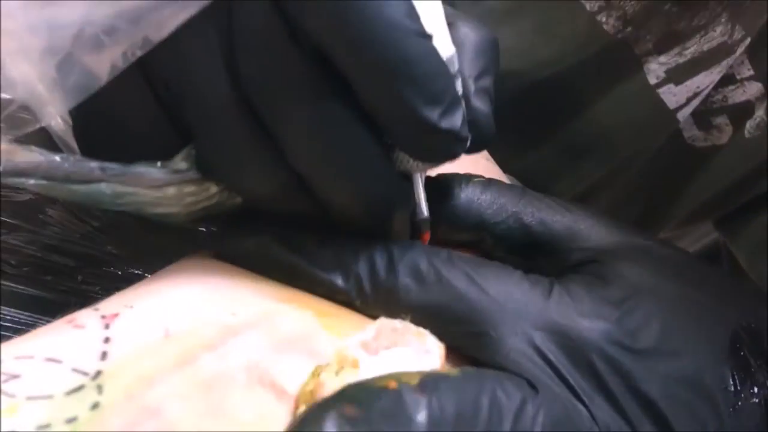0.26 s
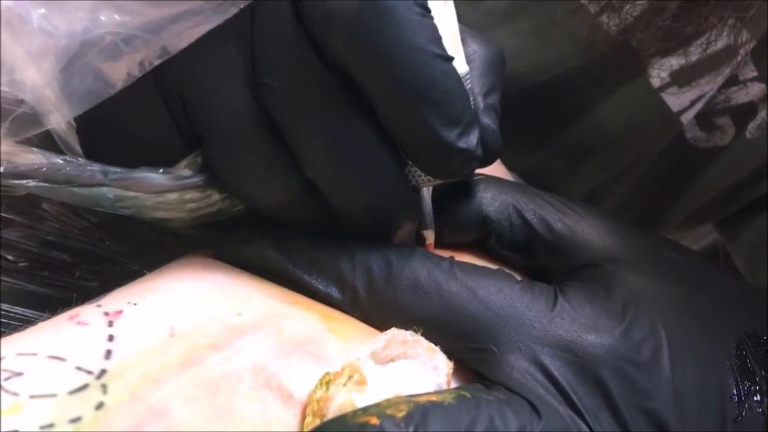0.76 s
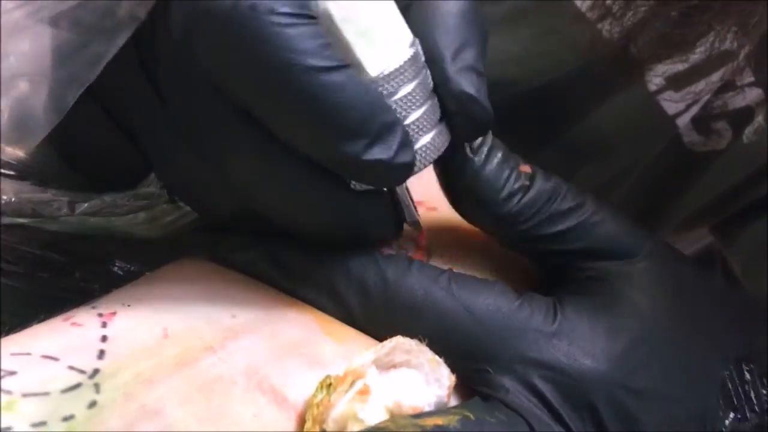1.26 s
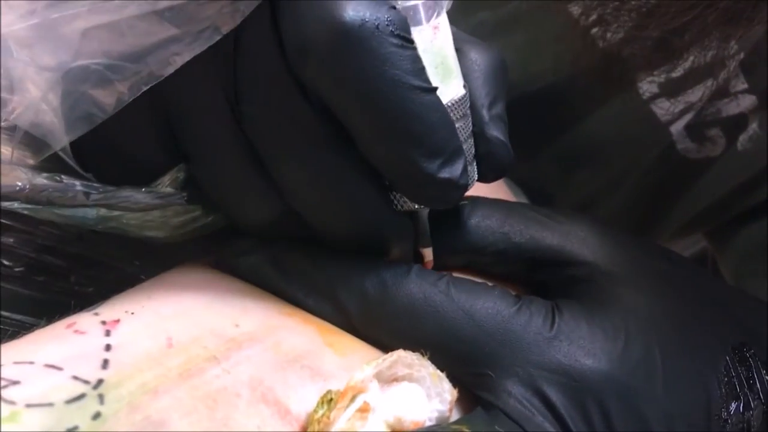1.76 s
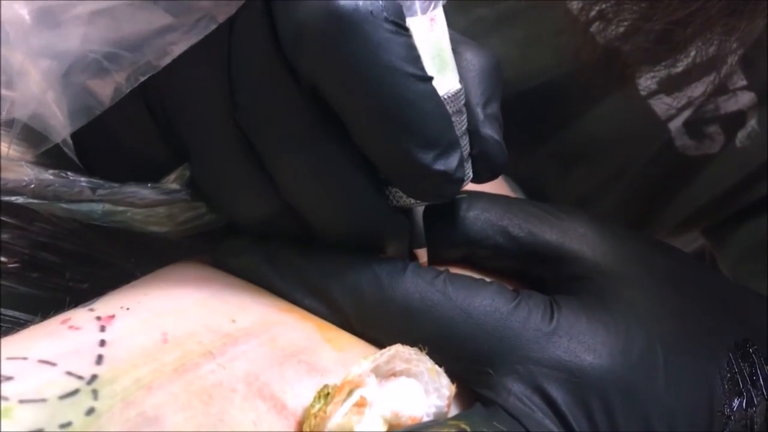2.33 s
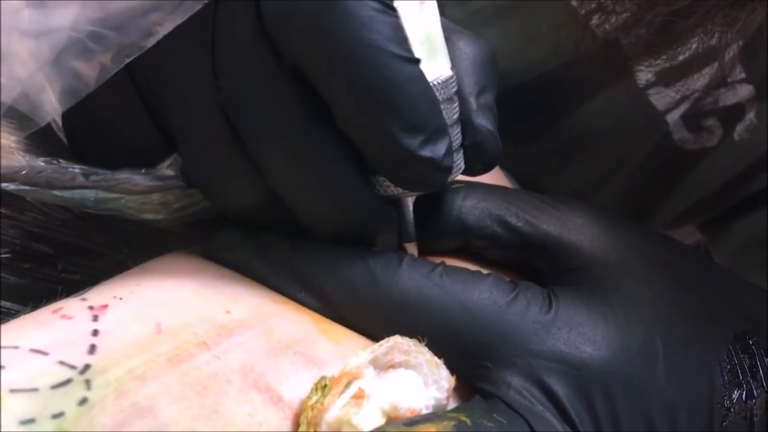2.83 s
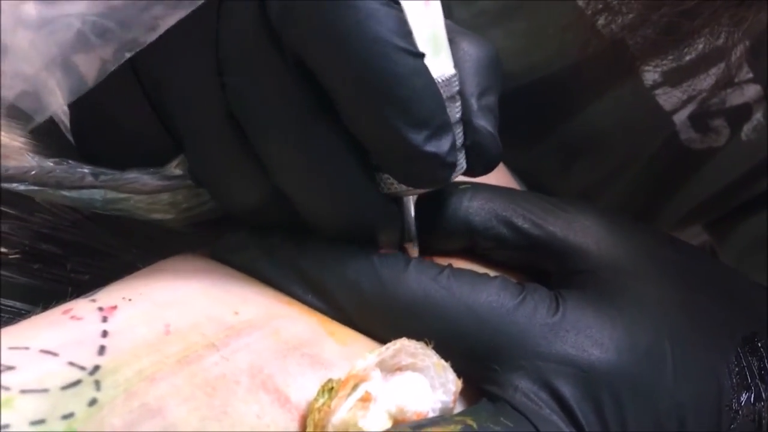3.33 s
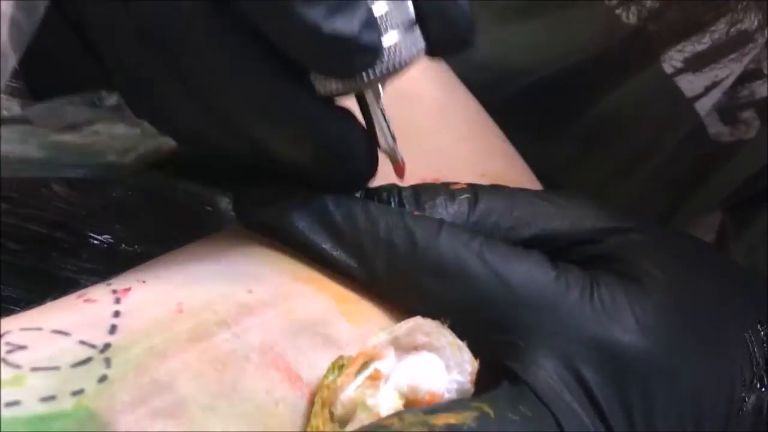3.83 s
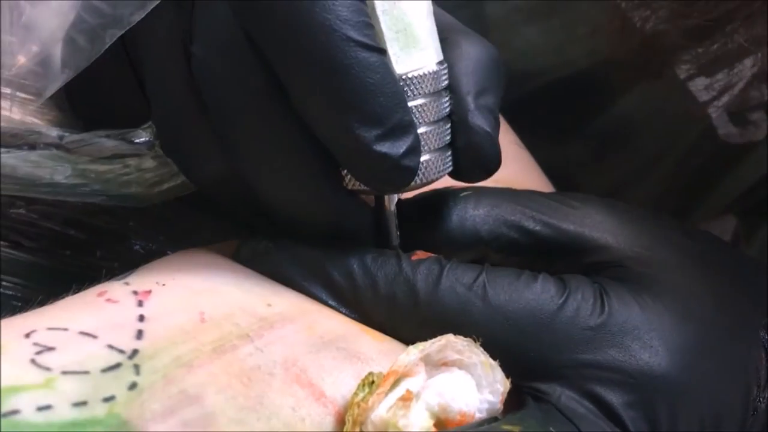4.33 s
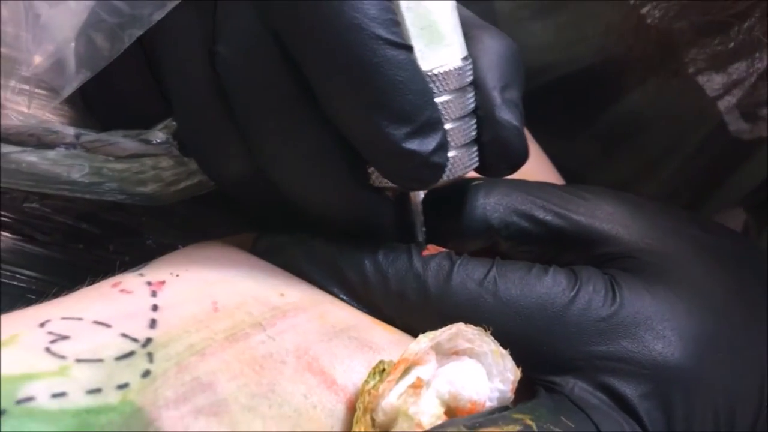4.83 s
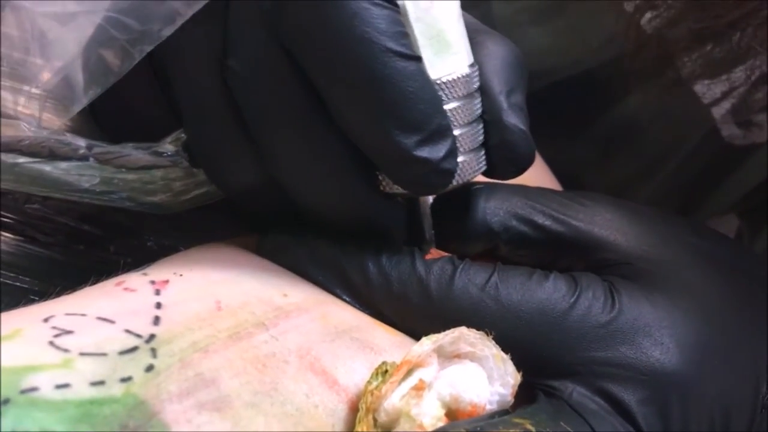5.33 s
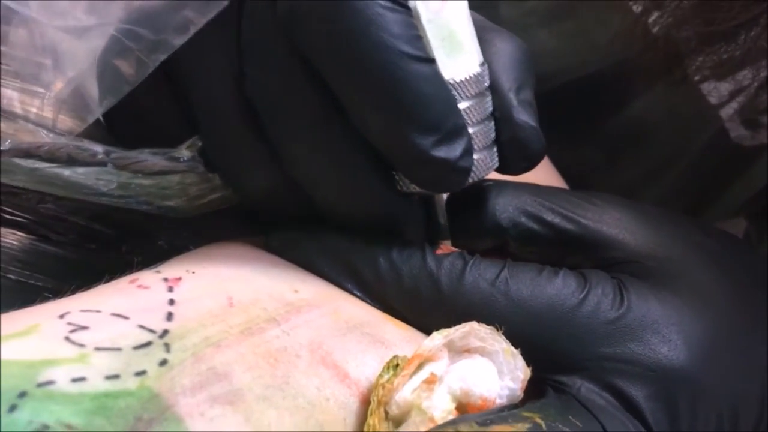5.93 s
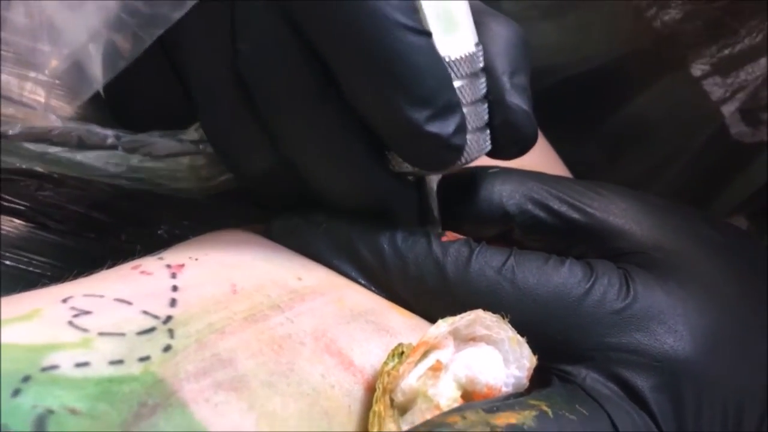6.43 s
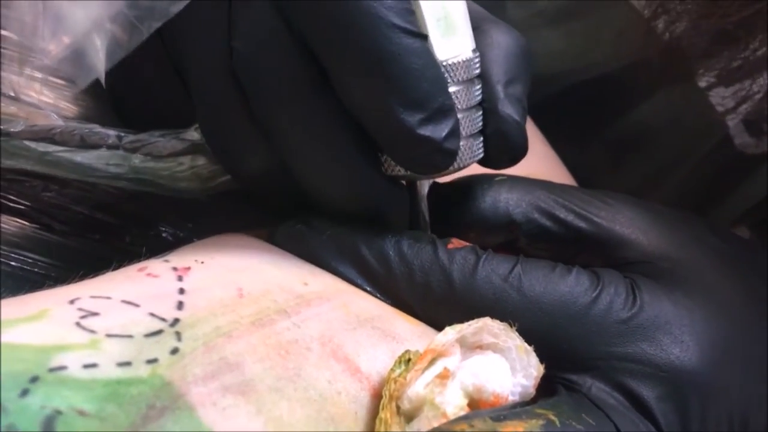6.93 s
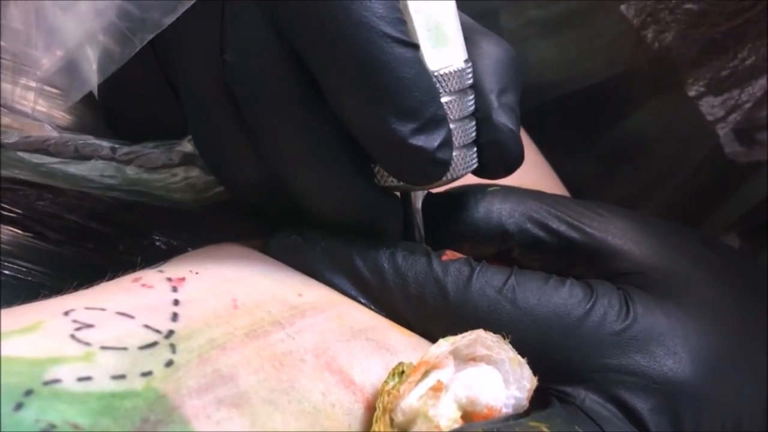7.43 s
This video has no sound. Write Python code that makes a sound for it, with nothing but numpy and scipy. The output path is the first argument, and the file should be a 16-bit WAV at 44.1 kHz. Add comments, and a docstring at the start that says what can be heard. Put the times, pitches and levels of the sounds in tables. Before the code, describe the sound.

In a quiet studio, a tattoo machine runs without stopping, heard close up as a thin, raspy metal buzz with a faint hum beneath. It wavers gently with the pressure of the needle on skin and changes colour slightly midway as the grip shifts. Tiny whistling dips flick through the buzz, and several soft low bumps sound toward the end.

```python
"""A small tattoo machine buzzes close by while its needle works on skin in a quiet studio.
Every stroke knocks the metal frame, whose tone depends on how it is held; the frame also sings on
a few overtones and the motor hums. The hand shades in small circles that load the motor.
Now and then the buzz thins for an instant to a few whistling tones. A few dull bumps come,
most near the end, over low room noise."""
import sys
import numpy as np
from scipy import signal
from scipy.fft import rfft, irfft
from scipy.io import wavfile
from scipy.ndimage import uniform_filter1d

SR = 44100
rng = np.random.default_rng(int(sys.argv[2]) if len(sys.argv) > 2 else 0)


def transcribe(u):
    """Save the signal u as a 16-bit wav file named by the first command-line argument.

    u: samples, shape (n,) or (channels, n), limited to [-1, 1]; the rate is SR.
    q: integer samples, one column per channel.
    """
    v = np.clip(np.atleast_2d(u).T, -1, 1)
    q = np.round(v * 32767).astype(np.int16)
    wavfile.write(sys.argv[1], SR, q)


N = 338727
TIME = np.arange(N) / SR

# moments when the buzz thins to a whistle: middle_s, length_s, depth_db (the dip is capped), whistle_hz
THIN_MOMENTS = [(0.021, 0.018, 9, 6150), (0.215, 0.015, 9, 13000), (0.38, 0.024, 9, 6270),
                (0.432, 0.012, 12, 8000), (0.518, 0.03, 18, 14440), (0.653, 0.019, 23, 7930),
                (0.689, 0.016, 14, 8000), (1.021, 0.014, 20, 6480), (1.481, 0.029, 12, 14700),
                (2.889, 0.025, 7, 8000), (3.347, 0.017, 13, 7660), (3.88, 0.013, 7, 7480),
                (4.059, 0.025, 9, 6530), (4.274, 0.035, 9, 4830), (4.433, 0.015, 19, 14860),
                (4.523, 0.041, 69, 15300), (4.608, 0.021, 9, 4820), (4.696, 0.023, 10, 7530),
                (4.777, 0.017, 12, 7440), (4.945, 0.025, 14, 6680), (4.976, 0.019, 16.5, 14800),
                (5.18, 0.013, 21.5, 14730), (5.841, 0.02, 14, 10760), (6.512, 0.015, 8, 11250),
                (7.11, 0.031, 35.5, 14500), (7.165, 0.017, 19, 8000), (7.25, 0.013, 16, 4850)]


def needle_drive(turns):
    """Each knock of the needle bar sets loose parts chattering; the bar rubs in its tube all the time."""
    # how hard and bright the bar knocks: time_s, force_db, extra_treble_db
    knock_strength = [(0, -2, 8.5), (.3, 0, -1.5), (1.1, -0.4, -3), (1.85, -0.5, 0), (2.7, -1.4, -3.5),
                      (3.0, 0.5, -3.5), (3.65, -1, -2), (3.95, 1, 0.5), (4.85, 0.1, -0.5), (5.6, -1.4, 0),
                      (6.25, -1.8, -.2), (6.7, -0.4, -0.7), (7.68, -0.1, -2)]
    chatter_db, rub_db, chatter_decay_turns = -17.5, -14, 0.45
    force_db, bright_db = in_time(knock_strength)
    free, first, second = grip_shares()
    treble = signal.butter(2, 9100, "high", fs=SR, output="sos")
    # the first grip is looser: its knocks land less evenly, spread further and rub more
    knocks = strokes(turns, jitter_s=4e-6 * free + 11e-6 * first + 6e-6 * second, uneven_db=.9)
    long_knocks = np.sqrt(1 - second) * bending_wave(knocks, travel_s=.0012)
    short_knocks = np.sqrt(second) * bending_wave(knocks, travel_s=.0003076)
    chatter = rms_one(rng.standard_normal(N) * np.exp(-(turns % 1) / chatter_decay_turns))
    rub = (1 + first) * signal.sosfiltfilt(treble, rng.standard_normal(N))
    drive = long_knocks + short_knocks + from_db(chatter_db) * chatter + from_db(rub_db) * rub
    drive += (from_db(bright_db) - 1) * signal.sosfiltfilt(treble, drive)
    return drive * from_db(force_db)


def strokes(turns, jitter_s, uneven_db):
    """One sharp knock per motor turn, each a little off in time and strength."""
    at = np.interp(np.arange(1, int(turns[-1])), turns, np.arange(N))
    chance = rng.standard_normal((len(at), 2))
    at = at + chance[:, 0] * jitter_s[at.astype(int)] * SR
    taps = np.round(at)[:, None].astype(int) + np.arange(-8, 9)
    offset = taps - at[:, None]
    knock = np.sinc(offset) * np.sinc(offset / 9)   # a click that can fall between samples
    out = np.zeros(N)
    np.add.at(out, np.clip(taps, 0, N - 1), knock * from_db(uneven_db * chance[:, 1:]))
    return rms_one(out)


def bending_wave(x, travel_s):
    """High pitches cross metal faster, so a knock becomes a falling chirp; travel_s holds at 10 kHz."""
    hz = np.arange(N // 2 + 1) * SR / N
    return irfft(rfft(x) * np.exp(-4j * np.pi * travel_s * np.sqrt(hz * 10000)), N)


def frame_ring(drive):
    """The frame rings with every knock; shifting fingers damp each resonance a little more or less."""
    # frame resonances, with relative levels: pitch_hz, width_hz, free_db, first_grip_db, second_grip_db
    resonances = [(662, 280, -68, -61.5, -61.5), (1320, 186, -58, -56, -56), (1700, 213, -59, -56, -55.5),
                  (1892, 110, -48, -57, -54), (2322, 123, -48, -51, -54), (2870, 304, -55, -57, -55),
                  (3590, 540, -54, -55, -57.5), (4774, 246, -49, -49.5, -49.5),
                  (5603, 260, -54, -50.5, -54.5), (6410, 440, -44, -44.5, -47.5),
                  (6750, 670, -43.5, -45.5, -46.5), (7730, 630, -41, -43.5, -45.5),
                  (8180, 700, -48, -45, -49.5), (9060, 650, -52, -53, -51.5),
                  (10840, 620, -57.5, -52.5, -45.5), (11600, 560, -49, -80, -45),
                  (11910, 1010, -48, -57, -51.5), (13270, 170, -37, -43.5, -42),
                  (13640, 890, -36, -50.5, -47), (15621, 600, -35, -46.5, -42.5)]
    tilt_db_per_octave, sway_db, gain_db = .5, 1.35, 20
    shares = grip_shares()
    out = np.zeros(N)
    for k, (hz, width, *grip_db) in enumerate(resonances):
        level_db = np.dot(grip_db, shares) + tilt_db_per_octave * np.log2(hz / SR) + sway_db * drift(3)
        out += (-1) ** k * from_db(level_db) * resonate(drive, hz, width)
    return from_db(gain_db) * out


def grip_shares():
    """How the machine is held: shares of running free, first grip and second grip, adding up to 1."""
    # lifting off the skin: time_s, lift (0 to 1)
    lifts = [(0, 0), (.21, 0.5), (.39, 0.04), (1.36, 0), (1.42, .75), (1.49, 1), (1.56, 0)]
    lifted = np.clip(in_time(lifts)[0], 0, 1)
    regripped = np.interp(TIME, [3.73, 3.77], [0, 1])
    return np.array([lifted, (1 - lifted) * (1 - regripped), (1 - lifted) * regripped])


def hand_circles():
    """The load on the needle swings between -1 and 1 as the hand circles, not quite evenly."""
    # spells of shading: start_s, end_s, depth (0 to 1)
    spells = [(0.754, 1.344, 0.75), (2.1, 2.62, 0.14), (2.803, 3.76, 1), (4.604, 5.3, 0.53), (5.3, 6.44, 1),
              (6.447, 7.68, 0.63)]
    circles_per_s, uneven_turns = 8.5, .15
    depth = sum(amount * ((TIME >= start) & (TIME < end)) for start, end, amount in spells)
    swing = np.sin(2 * np.pi * (circles_per_s * TIME + uneven_turns * drift(1.9)))
    return uniform_filter1d(np.clip(depth, 0, 1), SR // 20) * swing


def motor_turns(load):
    """Turns made so far: the motor runs faster off the skin and sags as the needle digs in."""
    # motor speed before the hand's circling and trembling: time_s, strokes_per_s
    speeds = [(0.0, 210.2), (0.3, 209.5), (0.34, 207.8), (0.47, 213.0), (0.7, 208.9), (1.35, 208.2),
              (1.41, 212.8), (1.5, 212.8), (1.67, 207.1), (1.92, 207.6), (2.03, 205.7), (2.14, 208.3),
              (2.46, 209.3), (2.74, 205.9), (2.89, 209.7), (3.49, 208.3), (3.53, 206.2), (3.98, 211.3),
              (4.92, 208.4), (5.82, 209.2), (6.16, 207.0), (6.63, 209.8), (7.59, 208.8), (7.68, 206.7)]
    sag_hz, tremble_hz = 1.0, .17
    return np.cumsum(in_time(speeds)[0] - sag_hz * load + tremble_hz * drift(14.27)) / SR


def motor_hum(turns):
    """The motor hums at the stroke rate, swaying a little in level."""
    # the hum before trim and sway: time_s, level_db
    levels = [(0.0, -57), (0.26, -42), (3.19, -43.5), (3.66, -42), (4.29, -50), (4.33, -44), (4.49, -55),
              (4.51, -93), (4.57, -50), (4.86, -44), (5.81, -43), (5.83, -49), (5.9, -41.5), (7.05, -49),
              (7.12, -38.5), (7.24, -47), (7.26, -60), (7.3, -43)]
    trim_db, sway_db = -.5, 0.75
    level_db = in_time(levels)[0] + trim_db + sway_db * drift(7)
    return harmonic(turns, 1, level_db, waver=0.18)


def frame_singing(turns, load, thin_gain):
    """The frame sings clean overtones set by the grip; load damps them, and they swell in thin moments."""
    # overtones before swell and sway: stroke_rate_multiple, free_db, first_grip_db, second_grip_db
    overtones = [(11, -54, -51.5, -75), (12, -40.5, -45, -42.5), (23, -77, -74, -57.5)]
    shares = grip_shares()
    swell_db = 2 * (1 - thin_gain) - 0.6 * load
    out = np.zeros(N)
    for multiple, *grip_db in overtones:
        level_db = np.dot(grip_db, shares) + swell_db + 0.46 * drift(1.9)
        out += harmonic(turns, multiple, level_db, waver=0.2)
    return out


def thinning():
    """A gain that dips smoothly at each thin moment, never quite to silence."""
    deepest_db = 36
    dip_db = sum(depth_db * np.exp(-np.minimum((2 * (TIME - middle_s) / length_s) ** 2, 20))
                 for middle_s, length_s, depth_db, _ in THIN_MOMENTS)
    return from_db(-np.minimum(dip_db, deepest_db))


def whistles():
    """In each thin moment one tone swells and fades; the deeper the dip, the likelier others join."""
    # high whistling tones that may join in during a thin moment: pitch_hz, peak_db
    side_tones = [(4830, -49), (6730, -38), (7700, -36.5), (11200, -42), (14600, -30)]
    main_db, all_join_depth_db, pitch_scatter = -38, 60, 0.017
    side_hz, side_db = np.transpose(side_tones)
    out = np.zeros(N)
    for middle_s, length_s, depth_db, main_hz in THIN_MOMENTS:
        pick, detune, phase = rng.random((3, len(side_hz)))
        gains = (pick < (depth_db / all_join_depth_db) ** 2) * from_db(side_db)
        half_s = 1.25 * length_s   # the whistle outlasts the dip
        near = abs(TIME - middle_s) < half_s
        t = TIME[near] - middle_s
        detuned_hz = side_hz * (1 + pitch_scatter * (2 * detune - 1))
        others = np.sin(2 * np.pi * (np.outer(t, detuned_hz) + phase)) @ gains
        main = from_db(main_db) * np.sin(2 * np.pi * main_hz * t)
        out[near] += np.cos(np.pi / 2 * t / half_s) * (main + others)
    return out


def studio_echoes(x):
    """Adds dull echoes off hands and bench; their paths shift, so each overtone swells and fades alone."""
    path_count, echo_db, fade_60_db_s, dull_above_hz = 6, -1.5, 0.17, 13000
    t = TIME[:SR // 8]
    shares = np.array([drift(26) for _ in range(path_count)])
    echoes = np.zeros(N)
    for share in shares / np.linalg.norm(shares, axis=0):
        tail = rng.standard_normal(len(t)) * from_db(-60 * t / fade_60_db_s) * (t > .001)
        echoes += share * signal.oaconvolve(x, tail / np.linalg.norm(tail))[:N]
    dull = signal.butter(1, dull_above_hz, fs=SR, output="sos")
    return x + from_db(echo_db) * signal.sosfilt(dull, echoes)


def bumps(rise_s):
    """Soft pushes each set off a short low boom."""
    # the pushes: start_s, level_db, decay_s
    pushes = [(3.88, -40.5, 0.062), (6.889, -40, 0.043), (7.344, -33, 0.053), (7.395, -36.5, 0.077),
              (7.456, -40, 0.045), (7.594, -31.5, 0.036), (7.645, -38, 0.065)]
    # resonances of the boom: pitch_hz, width_hz, relative_db
    boom_tones = [(129, 44, -4.5), (215, 12.6, 6), (304, 19, -2)]
    push = np.zeros(N)
    for start_s, level_db, decay_s in pushes:
        age = np.maximum(TIME - start_s, 0)
        push += from_db(level_db) * (1 - np.exp(-age / rise_s)) * np.exp(-age / decay_s)
    noise = rng.standard_normal(N)
    boom = sum((-1) ** k * from_db(db) * resonate(noise, hz, width)
               for k, (hz, width, db) in enumerate(boom_tones))
    return push * rms_one(signal.sosfilt(signal.butter(3, 400, fs=SR, output="sos"), boom))


def background():
    """Low room noise, a lumpy rumble beneath it and a faint mains hum."""
    # tone of the room noise: pitch_hz, relative_db
    room_spectrum = [(25, -49), (50, -20), (78, -3), (120, -8.5), (170, -2), (240, -1), (320, -11),
                     (500, -10), (900, -17.5), (2000, -19), (15000, -17)]
    room_db, rumble_db, mains_db, mains_hz = -44.5, -56.5, -59, 119.5
    mains = np.sqrt(2) * from_db(mains_db) * np.sin(2 * np.pi * mains_hz * TIME)
    lumps_db = 3.2 * drift(10)
    rumble = rms_one(resonate(rng.standard_normal(N), hz=101, width_hz=95))
    return from_db(room_db) * coloured_noise(room_spectrum) + from_db(rumble_db + lumps_db) * rumble + mains


def from_db(db):
    """Turns decibels into a gain."""
    return 10 ** (np.asarray(db) / 20)


def rms_one(x):
    """Scales a signal to an average strength (rms) of 1."""
    return x / np.sqrt(np.mean(x ** 2) + 1e-20)


def in_time(rows):
    """One curve for each column after the time, in straight lines between the rows."""
    times_s, *columns = np.transpose(rows)
    return [np.interp(TIME, times_s, column) for column in columns]


def drift(rate_hz):
    """A smooth random wander of typical size 1, mostly slower than rate_hz."""
    size = N // 64
    hz = np.arange(size // 2 + 1) * SR / N
    slow = irfft(rfft(rng.standard_normal(size)) / (1 + (hz / rate_hz) ** 2), size)
    return np.interp(np.linspace(0, size - 1, N), np.arange(size), rms_one(slow))


def resonate(x, hz, width_hz):
    """A resonance with a gain of 1 at its peak."""
    r = np.exp(-np.pi * width_hz / SR)
    feedback = [1, -2 * r * np.cos(2 * np.pi * hz / SR), r * r]
    return signal.lfilter(np.array([1, 0, -1]) * (1 - r * r) / 2, feedback, x)


def harmonic(turns, multiple, level_db, waver):
    """A clean tone at a multiple of the stroke rate, wavering slightly in strength and phase."""
    wobble = 1 + waver * (drift(26.6) + 1j * drift(52))
    return np.sqrt(2) * from_db(level_db) * np.real(wobble * np.exp(2j * np.pi * multiple * turns))


def coloured_noise(spectrum):
    """Steady noise of strength 1 with the given spectrum."""
    hz, db = np.transpose(spectrum)
    bins_hz = np.maximum(np.arange(N // 2 + 1) * SR / N, 1)
    gains = from_db(np.interp(np.log(bins_hz), np.log(hz), db))
    return rms_one(irfft(rfft(rng.standard_normal(N)) * gains, N))


def scene():
    """The machine close up in the room; buzz, background and bumps all dip in the thin moments."""
    load, thin_gain = hand_circles(), thinning()
    turns = motor_turns(load)
    drive = needle_drive(turns) * from_db(-0.7 * load)   # load softens the knock
    buzz = studio_echoes(frame_ring(drive))
    hum = motor_hum(turns)
    body = (buzz + background() + bumps(rise_s=0.0029)) * thin_gain
    return (body + hum + frame_singing(turns, load, thin_gain) + whistles())[None]


def record(dry):
    """The highest treble is cut off steeply."""
    cutoff_hz = 15750
    return signal.sosfilt(signal.ellip(12, .1, 80, cutoff_hz, fs=SR, output="sos"), dry)


dry = scene()
out = record(dry)
transcribe(out)
```